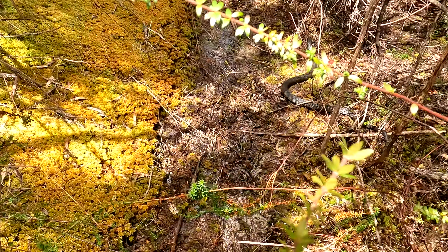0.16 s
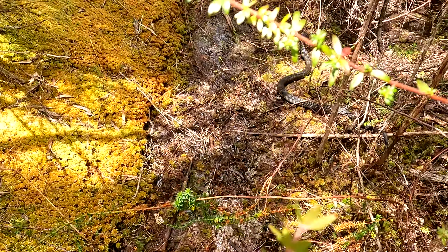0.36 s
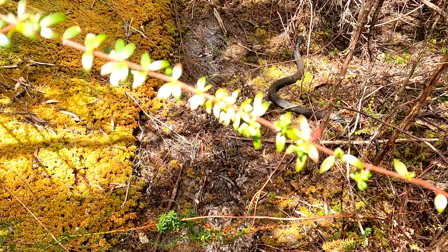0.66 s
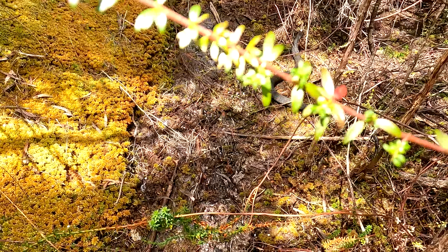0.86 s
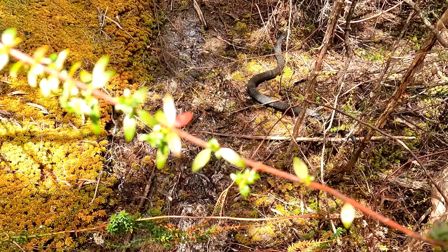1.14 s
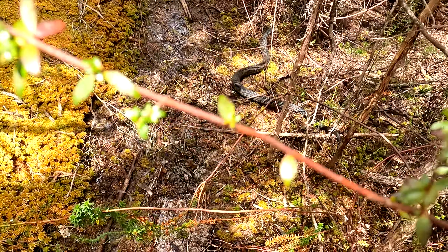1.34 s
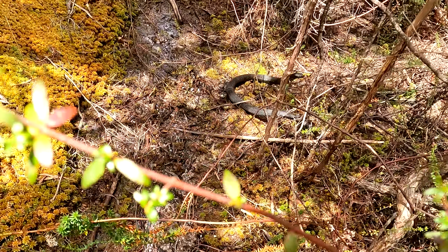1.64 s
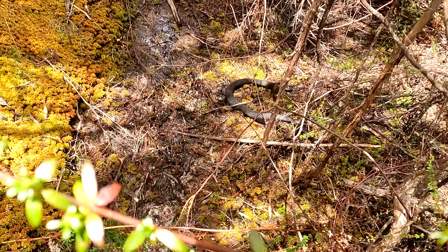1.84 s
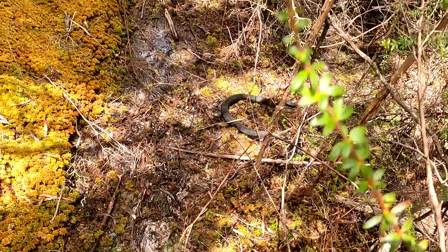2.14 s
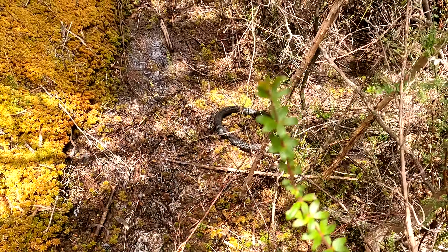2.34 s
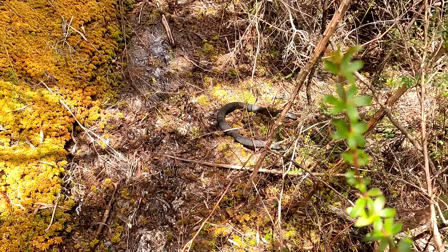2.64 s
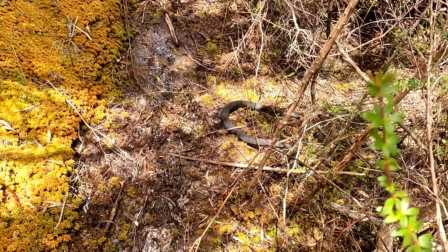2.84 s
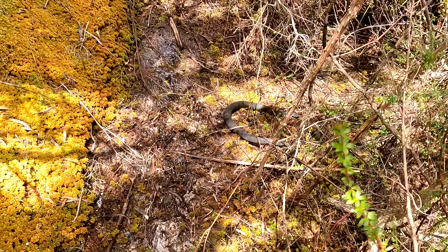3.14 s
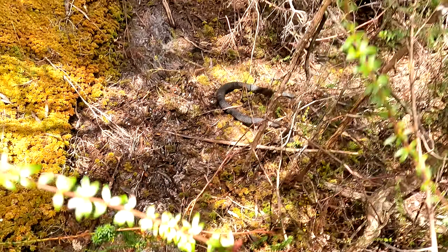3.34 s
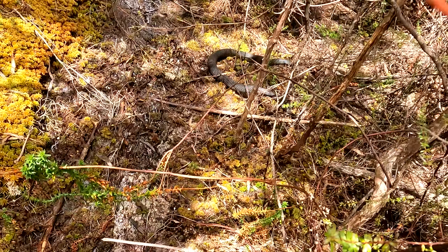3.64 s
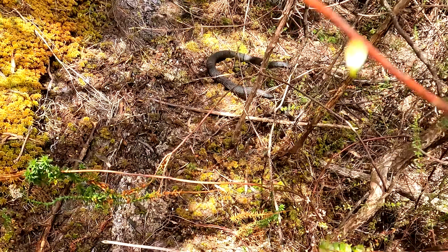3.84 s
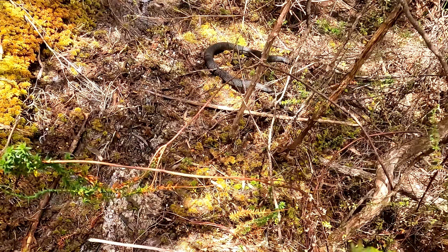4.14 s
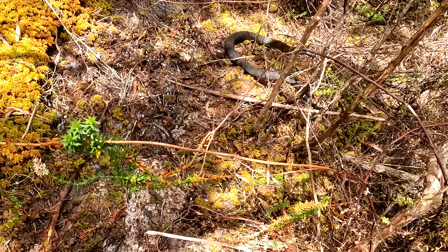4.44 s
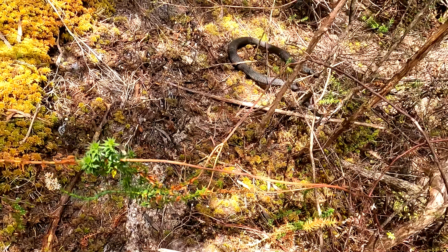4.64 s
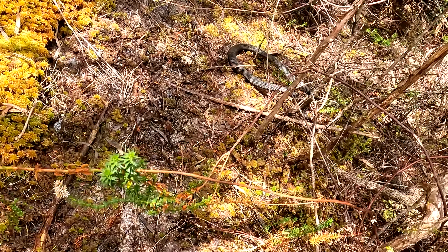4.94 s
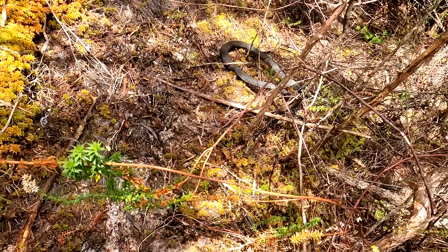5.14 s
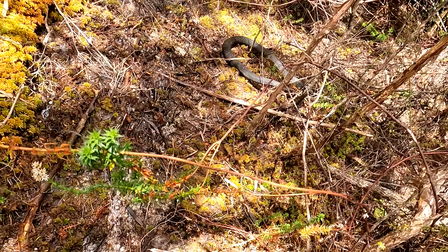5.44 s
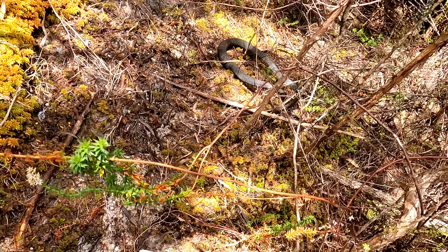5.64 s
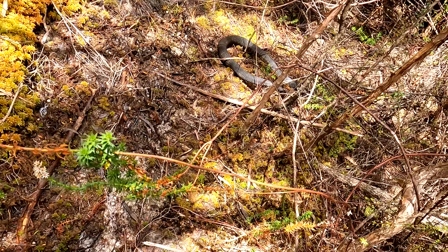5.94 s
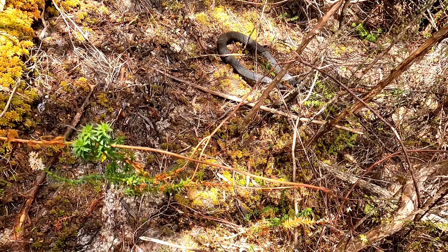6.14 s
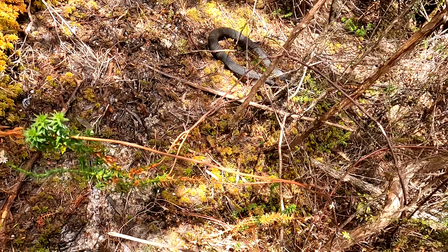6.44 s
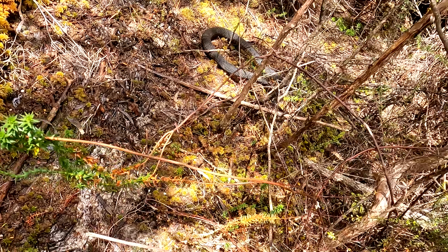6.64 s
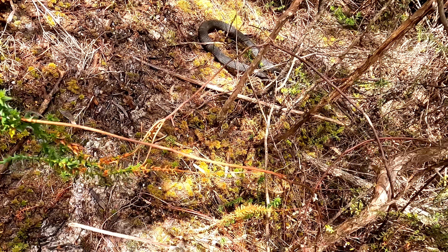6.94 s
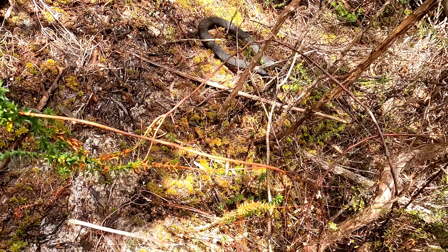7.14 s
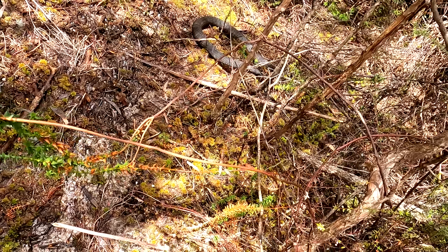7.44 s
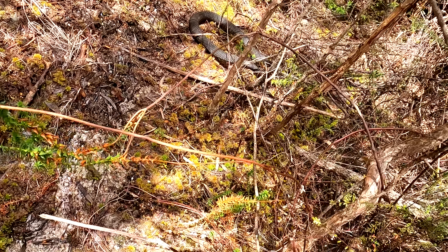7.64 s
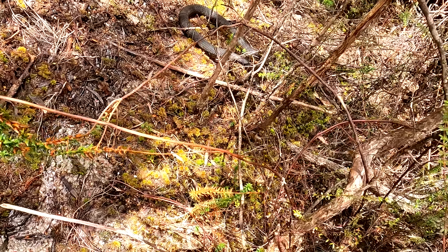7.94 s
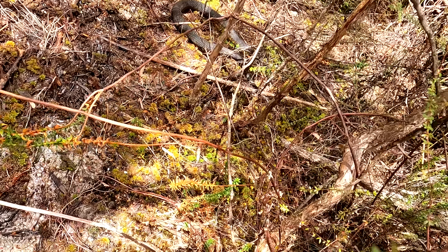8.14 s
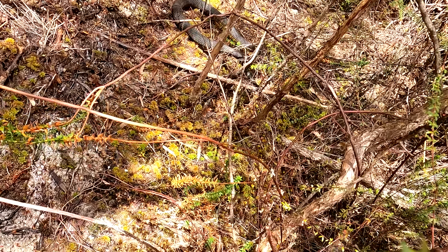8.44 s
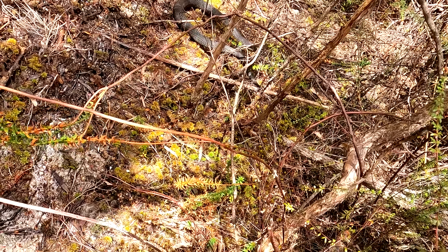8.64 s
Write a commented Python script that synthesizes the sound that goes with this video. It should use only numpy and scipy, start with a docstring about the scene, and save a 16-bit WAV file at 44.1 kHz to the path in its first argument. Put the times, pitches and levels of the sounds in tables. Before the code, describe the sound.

Very close stereo microphone, dry outdoor thicket. Leaves and stems rub past amid low, shaky handling rumble and small woody clicks. An early snake hiss bursts out, opens brighter and sinks away. Scuffs, jolts and a splintering stick snap lead to another fuller hiss. Dull springy thumps cluster after it, then sparser rustle, a late flurry of ticks and hollow case knocks, with weak airy hisses between.

```python
"""Close in low scrub, a camera held in the hand is pushed through the bushes over a faint outdoor wash. From
the start a leafy branch swishes past, leaves and stems (slipping noise) brush by, twigs tick (noise bursts),
and the case rumbles and rings (damped tones); soft hisses (resonant air) come and go. At 1.6 s a snake gives a
sharp hiss, an air jet that opens upward in pitch with a squeak and sinks away. Springy stems then thump
(falling tones), a sleeve and later a stem scuff the case; a stick cracks before a second hiss at 4.7 s."""
import sys
import numpy as np
from scipy import signal
from scipy.fft import rfft, irfft, next_fast_len
from scipy.io import wavfile
from scipy.ndimage import uniform_filter1d

SR = 44100
rng = np.random.default_rng(int(sys.argv[2]) if len(sys.argv) > 2 else 0)


def transcribe(u):
    """Save the signal u as a 16-bit wav file named by the first command-line argument.

    u: samples, shape (n,) or (channels, n), limited to [-1, 1]; the rate is SR.
    q: integer samples, one column per channel.
    """
    v = np.clip(np.atleast_2d(u).T, -1, 1)
    q = np.round(v * 32767).astype(np.int16)
    wavfile.write(sys.argv[1], SR, q)


N = 387638
TIME = np.arange(N) / SR


def amp(db):
    """Decibels to gain."""
    return 10 ** (np.asarray(db) / 20)


def unit(x):
    """Scales to rms 1."""
    return x / np.sqrt(np.mean(x ** 2) + 1e-20)


def read(points, hz):
    """Reads a spectrum in dB on a log-frequency axis."""
    f, db = np.transpose(points)
    return np.interp(np.log(hz + 1), np.log(f + 1), db)


def level(table, axis):
    """Gain over time from one dB column of a curve table."""
    rows = np.array(table)
    return amp(np.interp(TIME, rows[:, 0], rows[:, axis]))


def colour(x, spectrum):
    """Gives x a spectrum, at rms 1."""
    size = next_fast_len(x.shape[-1])
    gain = amp(read(spectrum, np.fft.rfftfreq(size, 1 / SR)))
    return unit(irfft(rfft(x, size) * gain, size)[..., :x.shape[-1]])


def smooth_patches(shape, bins, frames):
    """Random patches over frequency and time, at rms 1."""
    across = uniform_filter1d(rng.standard_normal(shape), size=bins, axis=0)
    return unit(uniform_filter1d(across, size=frames, axis=1))


def ports(pair, side_db, right_db):
    """Two microphone ports: a shared sound, an unshared part, and a lean to the right."""
    mid, side = pair[0], amp(side_db) * pair[1]
    return np.array([(mid + side) * amp(-right_db / 2), (mid - side) * amp(right_db / 2)])


def add(mix, s, sound):
    """Mixes a sound in at time s."""
    part = mix[..., max(round(s * SR), 0):][..., :sound.shape[-1]]
    part += sound[..., :part.shape[-1]]


def sine(hz, t):
    """A steady tone."""
    return np.sin(2 * np.pi * hz * t)


def friction(per_s, spread_db, grain_s, smooth):
    """Tiny slips of uneven size, each a short puff, over smooth sliding noise."""
    sizes = amp(spread_db * np.minimum(rng.exponential(1, N), 3.5))
    slips = (rng.random(N) < per_s / SR) * sizes
    power = signal.lfilter([1], [1, -np.exp(-1 / (grain_s * SR))], slips ** 2)
    return np.sqrt(power / power.mean() + smooth ** 2) * rng.standard_normal((2, N))


def swells(rows, axis):
    """Gain over time of events that rise and die away, with their peak dB in one column; powers add."""
    power = np.zeros(N)
    for row in rows:
        s, rise_s, t60 = row[:3]
        t = np.arange(0, rise_s + t60, 1 / SR)
        decay = amp(row[axis] - 60 * np.maximum(t - rise_s, 0) / t60)
        add(power, s, (np.minimum(t / rise_s, 1) * decay) ** 2)
    return np.sqrt(power)


# which port the contacts lie nearer: time_s, rubbing_right_db, leaves_right_db
CONTACT_LEAN = [(.4, -1.5, -1), (1.1, 2.5, -2), (1.9, 2, -1.5), (2.5, 4.5, -3.5), (3.3, 0.5, -3.5),
                (3.9, 6.5, -2.5), (4.5, 0.5, -3), (5.7, 5, -4), (7, 3, -2), (8.2, 6.5, -3.5), (8.78, 3, -2)]


def lean(axis):
    """Lean to the right in dB over time."""
    return 20 * np.log10(level(CONTACT_LEAN, axis=axis))


# faint wash of the open air, beyond the bushes: pitch_hz, density_db (per Hz)
AIR_SPECTRUM = [(20, 11.5), (200, -6), (400, -19.5), (900, -15.5), (1400, -6.5), (3000, -37), (7500, -31),
                (9000, -46), (12500, -30), (16000, -51)]


def outdoors():
    """Faint steady wash of the open air: coloured noise, spread wide."""
    return amp(-67.5) * ports(colour(rng.standard_normal((2, N)), AIR_SPECTRUM), side_db=-4.5, right_db=0.0)


# low shaking in the hand: pitch_hz, density_db (per Hz)
RUMBLE_SPECTRUM = [(8, 2), (22, 6.5), (38, 7), (60, -4), (100, -12.5), (140, -18), (400, -67)]
# the camera case when rubbed: pitch_hz, density_db (per Hz)
CASE_SPECTRUM = [(50, -2.5), (120, -3.5), (210, 5.5), (300, -4), (420, -13.5), (700, -23), (1500, -55)]
# unsteadiness of the hand between jolts: time_s, level_db
HAND_TREMBLE = [(0, -57), (1.0, -56.5), (1.55, -57.5), (2.1, -49), (2.3, -51), (3.2, -41.5), (4.0, -46),
                (4.85, -48.5), (5.9, -45.5), (6.3, -52), (6.8, -52), (7.6, -50.5), (8.35, -51),
                (8.78, -62.5)]
# light rubbing of the fingers on the case: time_s, level_db
FINGER_GRIP = [(0, -84), (.7, -54.5), (1.5, -57.5), (3.8, -58), (5.2, -61.5), (6.2, -68.5), (7.6, -62),
               (8.78, -69)]
# jolts of the camera, each swelling and dying away: start_s, rise_s, t60_s, rumble_db, rubbing_db
CAMERA_JOLTS = [(.15, 0.052, 0.73, -39, -44.5), (.41, 0.1, 1.16, -47, -48), (1.04, 0.062, 0.46, -58, -39.5),
                (1.65, 0.058, 0.27, -48, -60), (1.95, 0.034, 0.43, -38, -45),
                (2.07, 0.016, 0.21, -44, -44.5), (2.17, 0.027, 0.21, -50.5, -50),
                (2.36, 0.061, 1.2, -31.5, -43), (2.52, 0.062, 0.5, -35.5, -46),
                (2.8, 0.086, 0.59, -39.5, -49.5), (3.0, 0.057, 0.61, -38, -42.5),
                (3.42, 0.033, 0.56, -34, -48), (3.53, 0.054, 0.29, -30, -50.5),
                (4.11, 0.1, 0.42, -30, -46.5), (4.28, 0.062, 0.71, -28, -41),
                (4.53, 0.037, 0.058, -29, -49), (4.91, 0.078, 1.2, -41.5, -71),
                (5.12, 0.058, 0.26, -38.5, -72), (5.39, 0.02, 1.6, -36, -59), (5.61, 0.1, 0.19, -31.5, -75),
                (6.45, 0.036, 1.1, -40.5, -60), (6.92, 0.062, 0.52, -37, -60.5),
                (7.26, 0.067, 0.21, -42, -55), (7.44, 0.053, 0.52, -37, -57.5),
                (7.9, 0.054, 0.72, -45, -48), (8.14, 0.065, 0.29, -40.5, -43.5)]


def handling():
    """Low shaking of the camera and rubbing on its case, surging at each jolt, mostly nearer the right port."""
    shake = colour(rng.standard_normal((2, N)), RUMBLE_SPECTRUM)
    shake /= np.sqrt(uniform_filter1d(shake ** 2, size=2600, axis=1))  # the hand alone sets the strength
    shake *= np.hypot(level(HAND_TREMBLE, axis=1), swells(CAMERA_JOLTS, axis=3))
    rub = colour(friction(per_s=160, spread_db=3.0, grain_s=0.0085, smooth=0.27), CASE_SPECTRUM)
    rub *= np.hypot(level(FINGER_GRIP, axis=1), swells(CAMERA_JOLTS, axis=4))
    low = ports(shake, right_db=6.0, side_db=-13)
    body = ports(rub, right_db=lean(axis=1), side_db=-10.5)
    return amp(-1.5) * low + amp(-3.5) * body


# a leafy branch swishing close past the microphone: time_s, level_db
BRANCH_SWISH = [(0, -56), (.3, -53), (.55, -52), (.75, -64.5), (1.0, -64), (1.4, -100)]
# its spectrum: pitch_hz, density_db (per Hz)
BRANCH_SPECTRUM = [(300, 4), (900, 0.5), (1500, 1.5), (2800, -3), (4000, -5), (5500, -9), (8000, -14.5),
                   (15000, -36)]


def branch():
    """Soft leaves sweep past in a dense rustle of slips."""
    rustle = colour(friction(per_s=350, spread_db=7.5, grain_s=0.001, smooth=1.8), BRANCH_SPECTRUM)
    return ports(rustle * level(BRANCH_SWISH, axis=1), right_db=0.5, side_db=-41)


# level of the middle band of the brushing: time_s, level_db
BRUSH_MIDDLE = [(0, 4), (.55, 0.5), (.85, 4), (1.15, -0.5), (2.1, -5), (2.9, -3), (3.35, -4.5), (3.8, 1.5),
                (4.1, 0), (4.5, -3.5), (5.3, 4.5), (5.8, 7), (6.25, -1.5), (6.7, -1), (7.1, -3), (7.6, 1),
                (8.25, 2.5), (8.55, -4), (8.78, -4)]
MIDDLE_HZ, MIDDLE_WIDTH_HZ = 3100, 1800


def shifting(x, patchy_db):
    """The rustle's colour drifts as other leaves come near the microphone."""
    hz, at, z = signal.stft(x, SR, nperseg=512)
    patches = smooth_patches(z.shape[1:], bins=9, frames=32)
    band = np.exp(-((hz[:, None] - MIDDLE_HZ) / MIDDLE_WIDTH_HZ) ** 2)
    middle = band * np.interp(at, *np.transpose(BRUSH_MIDDLE))
    return signal.istft(z * amp(patchy_db * patches + middle), SR, nperseg=512)[1][:, :N]


# stems scraping past: pitch_hz, density_db (per Hz)
SCRAPE_SPECTRUM = [(200, -30), (450, 7), (650, 5), (900, -7), (1350, 4.5), (2100, -3), (3000, -6),
                   (4500, -31), (9000, -33)]
# small leaves rustling: pitch_hz, density_db (per Hz)
LEAF_SPECTRUM = [(800, -3.5), (2500, 2), (4000, 0.5), (5500, 2.5), (7600, 3.5), (8500, -7), (11000, -12.5),
                 (12300, -10.5), (14000, -35), (16000, -41)]
# the crackle of dry leaf edges: pitch_hz, density_db (per Hz)
EDGE_SPECTRUM = [(600, -10), (2500, -0.5), (7600, 3), (9000, -5), (12500, -11.5), (15500, -31)]
# density of the scrub sliding past: time_s, scrape_db, rustle_db
SCRUB_DENSITY = [(0, -79, -84), (.5, -62, -68.5), (.82, -73, -76), (1.05, -64, -66), (2.25, -63.5, -65.5),
                 (2.85, -59, -66), (3.35, -70.5, -69.5), (3.88, -65.5, -69), (4.05, -63.5, -58),
                 (5.15, -68.5, -66.5), (5.65, -66, -58.5), (5.9, -73, -68.5), (6.2, -77, -70.5),
                 (6.9, -65.5, -65.5), (7.6, -71, -74.5), (8.1, -78, -73), (8.45, -78, -71.5),
                 (8.78, -89, -69.5)]
# single sprigs dragged over the camera: start_s, rise_s, t60_s, scrape_db, rustle_db
DRAGGED_SPRIGS = [(0, 0.00061, 0.1, -45.5, -45), (.5, 0.039, 1, -54, -84), (1.05, 0.073, 0.36, -45.5, -61),
                  (1.39, 0.051, 0.16, -70, -56.5), (1.93, 0.019, 0.54, -45.5, -80),
                  (2.56, 0.044, 0.077, -64, -64), (2.85, 0.035, 0.26, -57.5, -60.5),
                  (3.05, 0.07, 0.32, -54, -64), (3.53, 0.026, 0.45, -56, -57.5),
                  (4.4, 0.09, 0.87, -51, -47), (4.6, 0.031, 0.35, -79, -51),
                  (5.37, 0.029, 0.23, -57, -53.5), (7.29, 0.055, 0.54, -73, -62.5),
                  (8.23, 0.049, 0.51, -74, -59)]


def brush(crackle_db=-6):
    """Stems scrape and small leaves rustle in slips, louder as each sprig drags past; dry leaf edges crackle."""
    stems = colour(friction(per_s=220, spread_db=10.5, grain_s=0.0067, smooth=1.0), SCRAPE_SPECTRUM)
    stems *= np.hypot(level(SCRUB_DENSITY, axis=1), swells(DRAGGED_SPRIGS, axis=3))
    rustle = colour(friction(per_s=210, spread_db=5.5, grain_s=0.0033, smooth=1.54), LEAF_SPECTRUM)
    edges = colour(friction(per_s=90, spread_db=6.5, grain_s=0.00058, smooth=0), EDGE_SPECTRUM)
    leaves = amp(-1.14) * rustle + amp(crackle_db) * edges
    leaves *= np.hypot(level(SCRUB_DENSITY, axis=2), swells(DRAGGED_SPRIGS, axis=4))
    both = ports(stems, side_db=-14.5, right_db=-0.5) + ports(leaves, side_db=-12.0, right_db=lean(axis=2))
    return shifting(both, patchy_db=2.2)


# twig ticks near the microphone, levels relative: start_s, wood_db, wood_pitch_hz, crisp_db, wood_t60_s
TWIG_TICKS = [(0.067, -38.5, 1130, -74, 0.067), (0.159, -50, 1510, -48, 0.014),
              (.204, -31, 1230, -59, 0.026), (0.452, -40, 1400, -35, 0.01), (.533, -29.5, 1530, -60, 0.026),
              (.738, -33, 1730, -53, 0.026), (0.861, -38.5, 1510, -67, 0.027),
              (1.055, -32, 790, -65, 0.042), (1.106, -30, 1250, -46, 0.044), (1.224, -35, 1500, -46, 0.023),
              (1.388, -34, 1460, -48, 0.016), (1.501, -29, 1450, -38.5, 0.028),
              (1.683, -19, 1810, -50, 0.01), (2.034, -42, 1400, -67, 0.023),
              (2.380, -30, 860, -46.5, 0.019), (2.443, -58, 1500, -43.5, 0.019),
              (2.602, -26, 1540, -52, 0.032), (2.633, -33.5, 880, -67, .03), (2.691, -47, 1540, -40, 0.011),
              (2.756, -30, 1230, -40, 0.03), (3.106, -50, 700, -49, .066), (3.163, -28.5, 980, -46, 0.033),
              (3.242, -46, 880, -73, 0.028), (3.332, -39, 990, -71, 0.018),
              (3.549, -43.5, 1410, -43.5, 0.044), (3.640, -34.5, 2020, -54, 0.025),
              (4.003, -35.5, 1970, -47, 0.039), (4.137, -60, 1400, -46, 0.0098),
              (4.163, -65, 1500, -42, 0.029), (4.289, -32.5, 1200, -56, 0.014),
              (4.338, -35, 1220, -52, 0.033), (4.384, -32, 1190, -55, 0.028),
              (4.4376, -45, 1800, -29.5, 0.01), (4.46, -46, 1200, -39, .01), (4.467, -34, 855, -59, 0.068),
              (4.484, -35, 945, -49, 0.015), (4.499, -41, 1300, -32, 0.0099),
              (4.511, -44, 1100, -34, 0.0087), (4.52, -39, 1320, -28.5, 0.011),
              (4.568, -38, 900, -52, .018), (4.583, -29, 960, -33, 0.021), (4.631, -55, 1547, -43, 0.011),
              (5.114, -51, 1503, -42.5, 0.12), (5.243, -45, 1520, -45, 0.026),
              (5.348, -30.5, 990, -41.5, 0.018), (5.389, -45, 1090, -50, 0.06),
              (5.478, -36, 1000, -43.5, 0.032), (5.494, -33, 776, -46, 0.038),
              (5.559, -35, 1110, -40, 0.021), (5.61, -52, 1400, -40, .014), (5.685, -52, 1400, -39, 0.02),
              (5.728, -41, 1250, -49, 0.02), (5.849, -41, 1410, -43.5, 0.022),
              (5.947, -41.5, 1320, -45.5, 0.042), (6.0768, -31.5, 1260, -51, 0.022),
              (6.395, -44, 1550, -42, 0.024), (6.566, -49, 1600, -49.5, 0.051),
              (6.902, -35, 1950, -63, 0.012), (6.904, -29.5, 660, -64, 0.022),
              (7.138, -64, 1500, -47, 0.039), (7.496, -62, 1315, -47.5, 0.017),
              (7.896, -39.5, 1940, -53, 0.041), (7.914, -48, 1480, -71, 0.03),
              (7.936, -45, 1500, -71, .022), (7.952, -49, 1450, -64, .02), (7.97, -45, 1570, -52, 0.034),
              (7.996, -50, 1480, -68, 0.028), (8.014, -42, 1460, -72, 0.038),
              (8.046, -36, 1290, -80, 0.024), (8.145, -39, 1520, -53, 0.025),
              (8.166, -41, 1350, -70, 0.033), (8.184, -37, 1330, -68, 0.054),
              (8.204, -34, 1410, -44, 0.027), (8.214, -34, 1380, -60, 0.029), (8.222, -42, 980, -70, 0.057),
              (8.29, -42, 1350, -64, 0.025), (8.5011, -61, 1400, -38.5, 0.012),
              (8.645, -66, 1500, -45, 0.026)]


def ticks():
    """A twig lets go: a short woody noise burst with a crisp top that decays more slowly."""
    out, t = np.zeros((2, N)), np.arange(SR // 8) / SR
    for s, wood_db, hz, crisp_db, t60 in TWIG_TICKS:
        wood, crisp = rng.standard_normal((2, 2, len(t)))
        wood_spectrum = [(hz / 6, -26), (hz * 0.95, -6), (hz, 0), (hz * 0.94, -2),
                         (hz * 1.46, -17), (hz * 2.24, -24), (hz * 7, -46)]
        layers = [(colour(wood, wood_spectrum), wood_db, t60),
                  (colour(crisp, LEAF_SPECTRUM), crisp_db, 3.4 * t60)]
        for grain, db, ring_s in layers:
            decay = amp(-60 * t / ring_s) * (1 - np.exp(-t / 0.00052))
            burst = grain * decay
            # the blow sets the energy of the burst
            energy = np.linalg.norm(decay) / np.linalg.norm(burst, axis=1, keepdims=True)
            add(out, s, amp(db - 10.5) * burst * energy)
    return ports(out, right_db=0.81 * lean(axis=2), side_db=-13.5)


# knocks that ring the camera case, levels relative: start_s, level_db, t60_s (scaled for each mode)
CASE_KNOCKS = [(.157, -29, 0.04), (0.205, -25, 0.062), (1.108, -25.5, 0.093), (1.667, -36, 0.16),
               (1.93, -30.5, 0.15), (1.994, -35, 0.081), (2.195, -49, 0.054), (2.56, -37, 0.077),
               (3.086, -47.5, 0.21), (4.167, -56, 0.073), (6.904, -34.5, 0.12), (7.906, -27, 0.091),
               (8.012, -39, 0.089), (8.046, -35, 0.075), (8.139, -31.5, 0.049), (8.198, -30.5, 0.084)]
# the ringing modes of the case: pitch_hz (before a random detune), level_db, share of the ring time
CASE_RINGS = [(96, -6, 1), (210, 4, 0.77), (267, -9, 0.7), (614, -4, 0.28), (1340, -18.5, 0.79)]


def knocks():
    """Harder contacts ring the camera case: damped tones, detuned afresh at each knock."""
    out, t = np.zeros(N), np.arange(SR // 4) / SR
    for s, db, t60 in CASE_KNOCKS:
        ring = np.zeros(len(t))
        detune = 1 + 0.1 * rng.standard_normal(len(CASE_RINGS))
        for (hz, mode_db, share), d in zip(CASE_RINGS, detune):
            ring += amp(mode_db - 60 * t / (t60 * share)) * sine(hz * d, t)
        add(out, s, amp(db) * ring * (1 - np.exp(-t / 0.0091)))
    return out * amp([[-3], [2]])


# a released stem twanging against the case, levels relative: start_s, level_db, pitch_hz, t60_s
STEM_TWANGS = [(.205, -44.5, 101.1, 0.7), (2.462, -40.5, 98, 1), (7.925, -35, 85.3, 0.79),
               (8.141, -41.5, 84.3, 0.7)]


def twangs():
    """A bent stem springs free and swings for a moment: a low damped tone."""
    out, t = np.zeros(N), np.arange(SR // 2) / SR
    for s, db, hz, t60 in STEM_TWANGS:
        add(out, s, amp(db - 60 * t / t60) * (1 - np.exp(-t / 0.0036)) * sine(hz, t))
    return out * amp([[-2.6], [2.1]])


def resonance(rows, t, width_hz):
    """Air noise through one moving resonance, on its pitch and level curve."""
    s, hz, db = np.transpose(rows)
    r = np.exp(-np.pi * width_hz / SR)
    band = rng.standard_normal((2, len(t))) + 1j * rng.standard_normal((2, len(t)))
    band = signal.lfilter([1], np.poly([r, r]), band)
    band /= np.sqrt(uniform_filter1d(abs(band) ** 2, size=700, axis=1))  # the air flow alone sets the strength
    turn = np.exp(2j * np.pi * np.cumsum(np.interp(t, s, hz)) / SR)
    return unit((band * turn).real) * amp(np.interp(t, s, db, left=-np.inf, right=-np.inf))


# the snake keeps pushing a little air: hollow in the throat, a thin whistle at the nostrils, or breathy:
# start_s, length_s, start_pitch_hz, end_pitch_hz, width_hz, level_db
SOFT_AIR = [(0.662, 0.2, 660, 607, 150, -57.5), (0.681, 0.22, 3370, 3300, 90, -69),
            (0.846, 0.21, 2820, 2730, 170, -63.5), (3.543, 0.5, 599, 645, 200, -59.5),
            (4.92, 0.2, 680, 613.5, 171, -50.5), (5.114, 0.17, 2820, 2760, 130, -60),
            (5.261, 0.29, 2780, 2810, 111, -70), (6.601, .18, 3310, 3450, 600, -69),
            (6.645, 0.19, 504, 588, 149, -67), (6.929, .48, 551, 569.5, 160, -63.5),
            (7.292, .17, 1360, 1380, 200, -68.5), (7.299, .18, 1815, 1946, 900, -65.5),
            (7.459, .37, 2352, 1855, 1470, -68), (8.615, 0.18, 3800, 3620, 200, -66.5),
            (8.63, 0.17, 3170, 3150, 200, -67), (8.631, .22, 532, 510, 150, -66)]
SOFT_RISE_S, SOFT_FALL_S = 0.043, 0.08


def soft_hisses():
    """Weak flows of air, each through one resonance, from thin whistle to broad breath, gliding in pitch."""
    out = np.zeros((2, N))
    for s, length, from_hz, to_hz, width_hz, db in SOFT_AIR:
        t = np.arange(0, length, 1 / SR)
        flow = np.minimum(t / SOFT_RISE_S, 1) * np.minimum((length - t) / SOFT_FALL_S, 1)
        add(out, s, flow * resonance([(0, from_hz, db), (length, to_hz, db)], t, width_hz))
    return out


# the air jet at a gape of 1: pitch_hz, density_db (per Hz)
JET_SPECTRUM = [(200, -23), (800, -16), (1450, -18.5), (1900, -12.5), (2300, -2), (3200, -1.5),
                (4200, -5.5), (5800, -5), (8000, -8.5), (10000, -11), (12500, -22), (16000, -32)]
# narrow peaks and dips that colour the hiss: pitch_hz (at flow 1), width_hz, lift_db
JET_PEAKS = [(2300, 61, 6), (2320, 52, -14), (2890, 37, 11), (3100, 46, 7), (3220, 60, 7), (3630, 200, 4.5),
             (5730, 250, 3.5), (7670, 390, 5), (8700, 74, -6), (12050, 600, 8.5)]
FIZZ_ABOVE_HZ = 810
DULL_START_DB_PER_OCTAVE = 1  # the fizz blooms only as the jet gathers speed
HISS_RELEASE_S = 0.046
GAPE_EXPONENT = 0.15  # the mouth opens with this power of the air flow
PEAK_GLIDE = 0.025  # the narrow peaks and dips rise with this power of the air flow
# unevenness of the hiss: marked at full flow, smoother midway, sputtering again at the end
FLUTTER_DB, SPUTTER_DB = 0.14, 1.8
MOUTH_WIDTH_HZ = 390


def hiss(row, throat_rows, mouth_rows, throat_width_hz):
    """An air jet swells, holds and sputters out, brighter as the mouth opens, with moving resonances."""
    start, rise_s, hold_s, length, peak_db, sag_db_per_s, widest, fizz_db = row
    first, last = throat_rows[0][0], throat_rows[-1][0]
    t = np.arange(first, last, 1 / SR)
    age = t - start
    air_left = amp(-sag_db_per_s * np.maximum(age - rise_s - hold_s, 0))
    flow = np.clip(age / rise_s, 0, 1) * np.clip((length - age) / HISS_RELEASE_S, 0, 1) * air_left
    hz, at, noise = signal.stft(rng.standard_normal((2, len(t))), SR, nperseg=1024, noverlap=896)
    hz, at = hz[:, None], at + first
    force = np.interp(at, t, flow) + 0.0092
    gape = widest * force ** GAPE_EXPONENT
    # the gape moves the low resonances most and the fizz at the top far less
    jet_db = read(JET_SPECTRUM, hz / gape ** (1 / (1 + (hz / 5000) ** 2)))
    for f, width, db in JET_PEAKS:
        jet_db = jet_db + db / (1 + (2 * (hz - f * force ** PEAK_GLIDE) / width) ** 2)
    opened = np.clip((at - start) / rise_s, 0, 1)
    tilt_db = fizz_db - DULL_START_DB_PER_OCTAVE * (1 - opened)
    jet_db = jet_db + tilt_db * np.log2(np.maximum(hz / FIZZ_ABOVE_HZ, 1))
    # turbulence makes patches of the spectrum come and go
    jet_db = jet_db + 2.6 * smooth_patches(jet_db.shape, bins=6, frames=12)
    shape = amp(jet_db)
    shaped = noise * shape / np.linalg.norm(shape, axis=0)  # each moment's colour at equal strength
    jet = signal.istft(shaped, SR, nperseg=1024, noverlap=896)[1][:, :len(t)]
    throat = resonance(throat_rows, t, throat_width_hz)
    mouth = resonance(mouth_rows, t, MOUTH_WIDTH_HZ)
    out = unit(jet) * amp(peak_db) * flow + throat + mouth
    flutter = unit(uniform_filter1d(rng.standard_normal(len(t)), size=200))
    return first, out * amp((FLUTTER_DB + SPUTTER_DB * (0.5 - air_left)) * flutter)


# the glottis squeaks as the first hiss bursts through it: time_s, pitch_hz, level_db (relative)
GLOTTIS_SQUEAK = [(1.611, 450, -56), (1.619, 620, -38), (1.624, 860, -30), (1.628, 1000, -30),
                  (1.631, 1060, -44), (1.64, 1150, -54)]


def squeak(gain_db=-3.0):
    """A brief, nearly pure upward chirp."""
    s, hz, db = np.transpose(GLOTTIS_SQUEAK)
    t = np.arange(s[0], s[-1], 1 / SR)
    turns = np.cumsum(np.interp(t, s, hz)) / SR
    return s[0], amp(gain_db + np.interp(t, s, db)) * np.sin(2 * np.pi * turns)


def thicket(x, wet_db, t60, count=60):
    """Nearby ground and stems throw back many faint early echoes, which comb the spectrum."""
    t = np.arange(SR // 20) / SR
    taps = np.zeros(len(t))
    taps[rng.integers(20, len(t), count)] = rng.choice([-1., 1.], count)
    taps *= amp(-60 * t / t60)
    echoes = signal.oaconvolve(x, taps[None] / np.linalg.norm(taps), axes=1)[:, :N]
    return x + amp(wet_db) * echoes


# the sharp hisses: start_s, rise_s, hold_s, length_s, peak_flow_db,
# sag_db_per_s (as the air runs out), widest_gape (factor on the jet spectrum), fizz_db_per_octave
SHARP_HISSES = [(1.606, 0.11, 0.016, 0.408, -33.5, 70.5, 0.69, 1.5),
                (4.711, 0.083, 0.043, 0.51, -30.5, 112, 0.9, 0.8)]
# the throat, heard as each hiss opens and closes; one table a hiss: time_s, pitch_hz, level_db
THROAT_CURVES = [
    [(1.606, 430, -60), (1.616, 590, -48), (1.621, 760, -43), (1.627, 930, -41), (1.632, 1050, -41),
     (1.642, 1180, -44), (1.665, 802, -47), (1.75, 1065, -61.5), (1.85, 1041, -58.5), (1.95, 1026, -51.5),
     (2.04, 895, -63)],
    [(4.696, 635, -64), (4.714, 668, -45.5), (4.73, 1019, -42), (4.76, 1124, -42), (4.79, 1190, -45),
     (4.85, 1249, -54), (4.92, 1130, -45), (4.97, 1090, -49), (5.0, 990, -44), (5.05, 880, -53),
     (5.11, 740, -63), (5.16, 640, -85)],
]
# the mouth cavity's resonance; one table a hiss: time_s, pitch_hz, level_db
MOUTH_CURVES = [
    [(1.615, 1300, -57), (1.635, 1950, -48), (1.655, 2150, -42), (1.68, 1700, -43), (1.71, 1700, -44),
     (1.77, 1820, -59), (1.82, 1800, -54), (1.855, 2150, -44), (1.89, 2020, -47), (1.96, 1850, -52),
     (2.03, 1800, -67)],
    [(4.715, 1400, -57), (4.745, 1700, -40), (4.762, 2150, -39.5), (4.80, 2220, -34), (4.835, 2300, -45),
     (4.87, 2180, -36), (4.92, 2130, -49), (4.98, 2050, -56), (5.08, 1900, -62)],
]
# width of the throat resonance, one a hiss: width_hz
THROAT_WIDTHS = [300, 530]


def snake():
    """Both sharp hisses, the squeak and the soft hisses around them, heard through the scrub."""
    out = soft_hisses()
    for shape in zip(SHARP_HISSES, THROAT_CURVES, MOUTH_CURVES, THROAT_WIDTHS):
        add(out, *hiss(*shape))
    add(out[0], *squeak())  # into the shared sound only
    return ports(thicket(out, t60=0.66, wet_db=-14.0), right_db=1.05, side_db=-14.0)


# stems thumping the camera, levels relative:
# start_s, level_db, pitch_drop_hz (above the resting pitch), peak_s, glide_s (pitch decay constant)
STEM_THUMPS = [(1.941, -33, 338, 0.012, 0.0082), (2.363, -26.5, 120, 0.024, 0.0036),
               (3.033, -31, 110, 0.015, 0.0035), (3.149, -38.5, 300, 0.0082, 0.0085),
               (3.172, -34.5, 130, 0.0081, 0.004), (3.455, -36.5, 338, 0.0046, 0.0041),
               (3.564, -38, 185, 0.012, 0.005), (4.165, -33, 302, 0.014, 0.0059),
               (4.184, -33.5, 323, 0.013, 0.0059), (4.207, -34.5, 330, 0.0089, 0.0074),
               (4.289, -23, 432, 0.015, 0.0052), (4.336, -26, 448, 0.0099, 0.0053),
               (4.382, -22, 430, 0.019, 0.0048), (4.57, -36.5, 260, 0.015, 0.0095),
               (4.731, -29.5, 385, 0.017, 0.0051), (4.772, -28, 382, 0.0098, 0.0071),
               (5.157, -37, 90.5, 0.023, 0.0093), (5.382, -31.5, 463, 0.0099, 0.0066),
               (5.55, -25, 365, 0.012, 0.0065), (5.726, -26, 332, 0.012, 0.0064),
               (5.821, -24, 320, 0.017, 0.0059), (5.942, -25.5, 415, .015, 0.0053),
               (6.077, -24, 483, 0.016, 0.0047), (7.294, -42, 302, 0.017, 0.0063),
               (7.721, -34, 366, 0.013, 0.0054), (8.388, -37.5, 282, 0.018, 0.0046)]


def thumps(rest_hz=37, steep=2.2, rattle_db=-13):
    """A struck stem carries high bending waves fastest: each thump swells, falling in pitch, and rattles."""
    out, t = np.zeros(N), np.arange(SR // 6) / SR
    for s, db, hz, peak_s, glide in STEM_THUMPS:
        turns = np.cumsum(rest_hz + hz * np.exp(-t / glide)) / SR
        swell = (t / peak_s * np.exp(1 - t / peak_s)) ** steep
        first = 0.21 * (1 - np.exp(-t / 0.0014)) * np.exp(-t / 0.0014)
        tone = (swell + first) * np.sin(2 * np.pi * turns)
        rattle = colour(rng.standard_normal(len(t)), CASE_SPECTRUM)
        rattle *= (1 - np.exp(-t / 0.0077)) * np.exp(-t / 0.016)
        add(out, s, amp(db) * (tone + amp(rattle_db) * rattle))
    return out * amp([[-2.8], [2.2]])


# scuffs along the case, first a sleeve rubbing it twice, then a stem; one table each: time_s, level_db
CASE_SCUFFS = [
    [(2.36, -60), (2.42, -61), (2.51, -50.5), (2.59, -49.5), (2.62, -47.5), (2.66, -87)],
    [(3.01, -58.5), (3.06, -54.5), (3.11, -40.5), (3.15, -52.5), (3.19, -68)],
    [(7.9, -63.5), (7.98, -71), (8.05, -71), (8.08, -77)],
]
# the scuffed case's resonances: pitch_hz, width_hz, level_db
SCUFF_RESONANCES = [(628, 66, -0.5), (1010, 82, -8), (1630, 1080, -16), (1905, 90, -4.5), (2680, 100, -16)]


def scuffs():
    """A sleeve, and later a stem, drag along the case; the slips sound its resonances."""
    hz = np.geomspace(100, 16000, num=200)
    power = sum(amp(db) ** 2 / (1 + ((hz - f) / width) ** 2) ** 2 for f, width, db in SCUFF_RESONANCES)
    spectrum = np.c_[hz, 10 * np.log10(power)]
    drag = colour(friction(per_s=310, spread_db=2.0, grain_s=0.0013, smooth=0.89), spectrum)
    force = np.zeros(N)
    for rows in CASE_SCUFFS:
        force += level(rows, axis=1) * (TIME > rows[0][0]) * (TIME < rows[-1][0])
    return ports(drag * force, side_db=-7.5, right_db=1.5)


# a dry stick cracking in quick stages, levels relative:
# start_s, level_db, wood_pitch_factor, crisp_top_db
STICK_CRACKS = [(3.907, -22, 0.91, -0.5), (3.911, -41, 0.85, -4), (3.9182, -33, 0.48, -10),
                (3.9188, -28, 0.72, -10), (3.924, -42, 0.78, -4), (3.927, -40, 0.77, -2),
                (3.9295, -34, 0.85, -4), (3.936, -30.5, 0.92, -14)]
# the stick's wood: pitch_hz (before the stage's factor), level_db, t60_s
STICK_WOOD = [(1660, -4, 0.0072), (2540, -1.5, 0.0084)]
# the stick's crisp top: pitch_hz, level_db, t60_s
STICK_CRISP = (7150, -8, 0.0057)


def crack():
    """The fibres of a stick give way one after another, each ringing the wood for a few milliseconds."""
    out, t = np.zeros((2, N)), np.arange(SR // 30) / SR
    top_hz, top_db, top_t60 = STICK_CRISP
    for s, db, pitch, crisp_db in STICK_CRACKS:
        wood = np.zeros(len(t))
        for k, (hz, mode_db, t60) in enumerate(STICK_WOOD):
            wood += (-1) ** k * amp(mode_db - 60 * t / t60) * sine(hz * pitch, t)
        top = amp(top_db + crisp_db - 60 * t / top_t60) * sine(top_hz, t)
        both = wood * amp([[0.4], [-0.4]]) + top * amp([[4], [-8]])  # the top leans left
        add(out, s, amp(db) * (1 - np.exp(-t / 0.000082)) * both)
    return out


def scene():
    """Everything at the microphone."""
    scrub = outdoors() + handling() + branch() + brush() + ticks() + knocks() + twangs()
    return scrub + snake() + thumps() + scuffs() + crack()


# stereo width of the microphone pair: pitch_hz, side_gain_db
PAIR_WIDTH = [(70, 1), (140, 2), (250, 5.5), (500, 3.5), (2000, 4.5), (4500, 3), (7000, 8.5), (9500, -0.5),
              (12000, 5.5)]
EDGE_HZ = 15650  # upper band limit


def record(dry):
    """The microphone pair's stereo width, then the recorder's band limit."""
    mid, size = dry.mean(0), next_fast_len(N)
    gain = amp(read(PAIR_WIDTH, np.fft.rfftfreq(size, 1 / SR)))
    side = irfft(rfft(dry[0] - mid, size) * gain, size)[:N]
    lowpass = signal.firwin(511, EDGE_HZ, window=("kaiser", 9), fs=SR)
    return signal.oaconvolve(np.array([mid + side, mid - side]), lowpass[None], "same")


dry = scene()
out = record(dry)
transcribe(out)
```